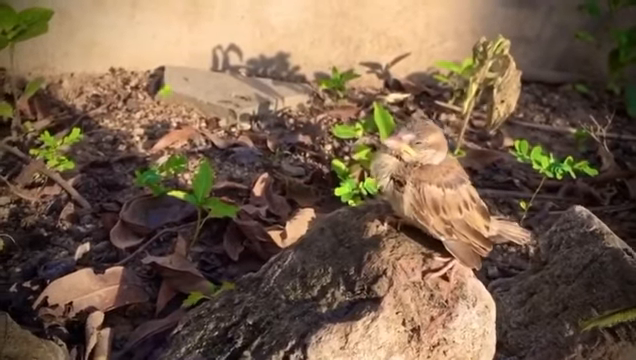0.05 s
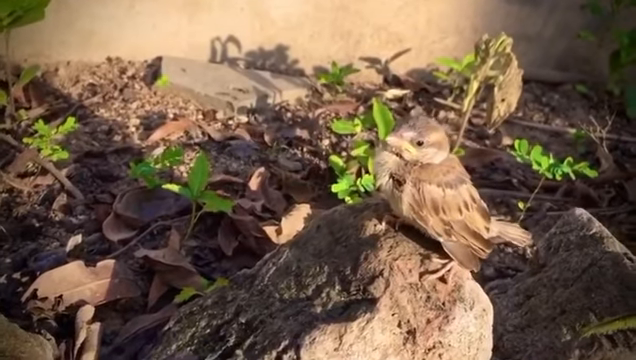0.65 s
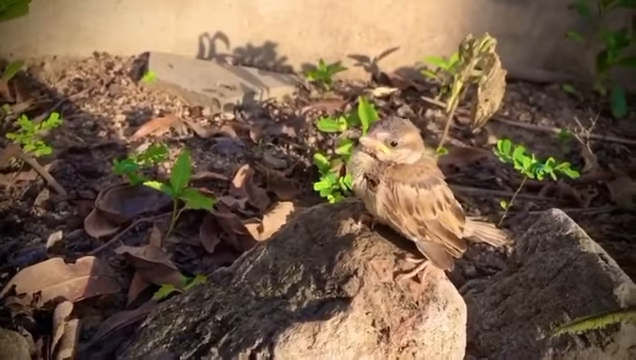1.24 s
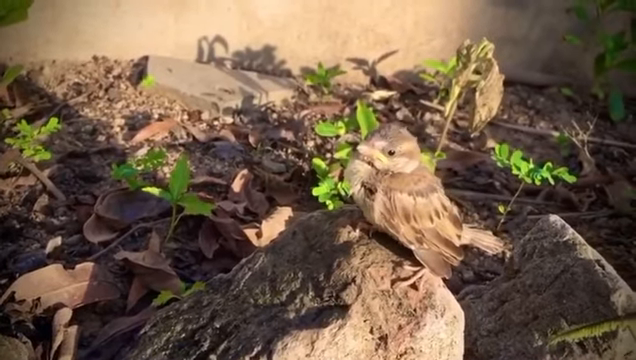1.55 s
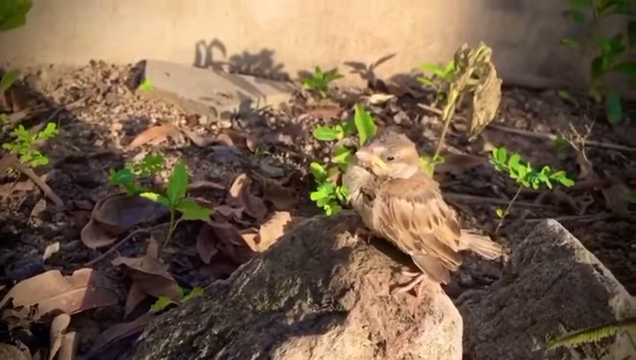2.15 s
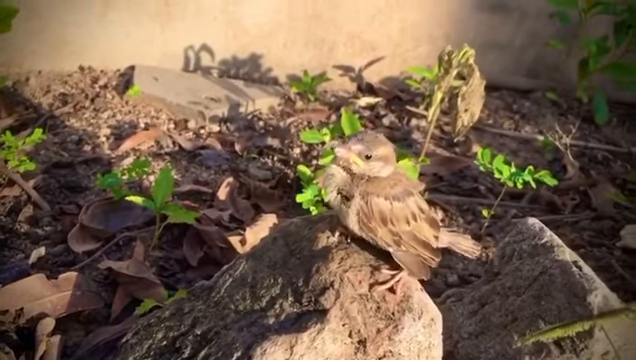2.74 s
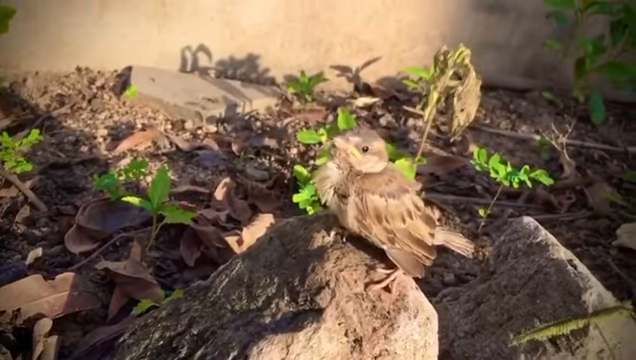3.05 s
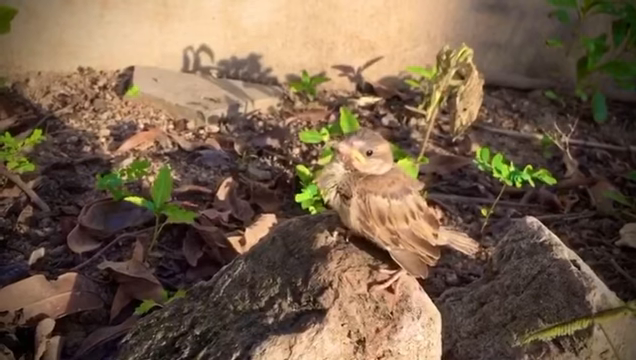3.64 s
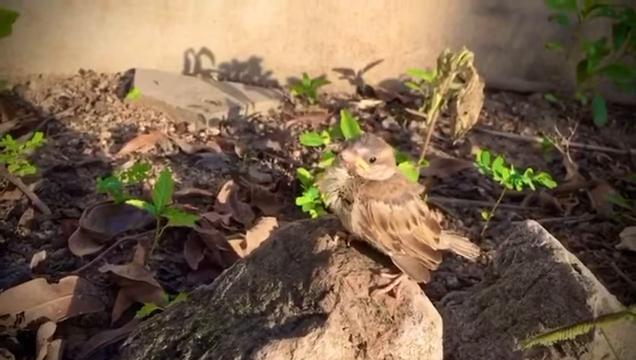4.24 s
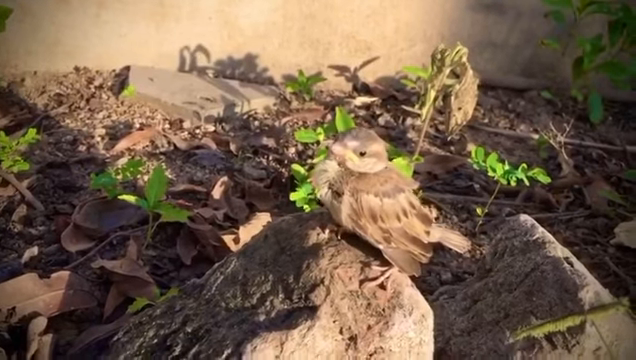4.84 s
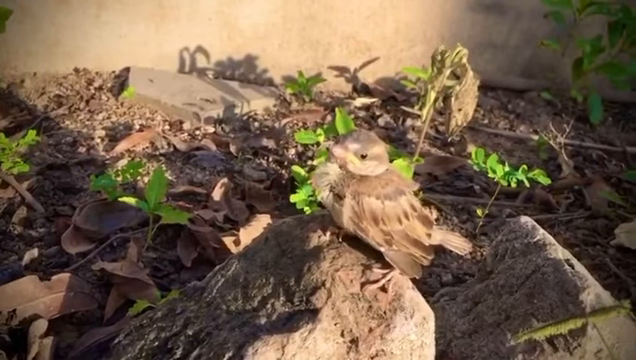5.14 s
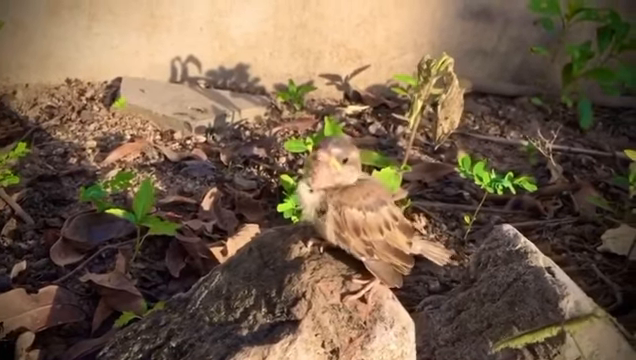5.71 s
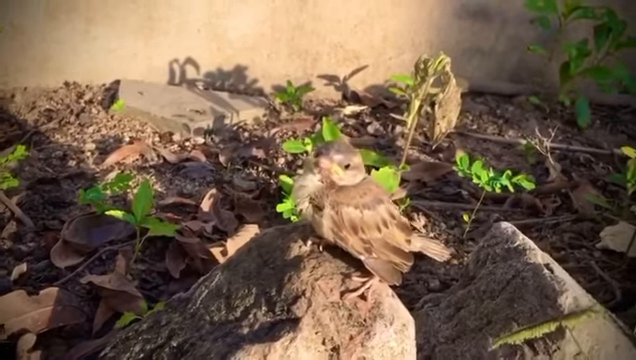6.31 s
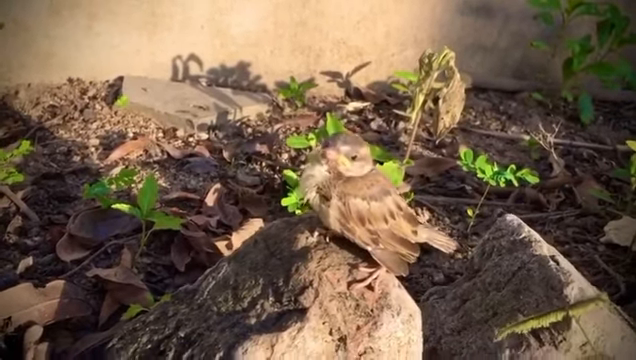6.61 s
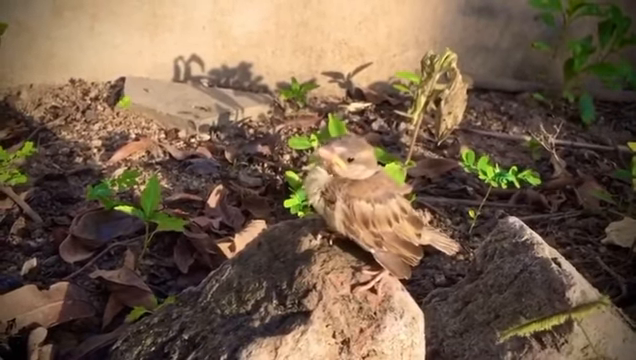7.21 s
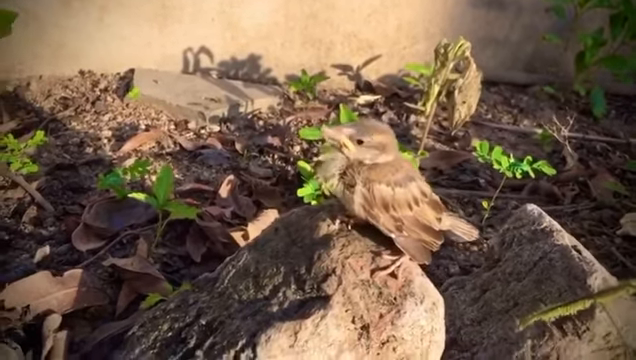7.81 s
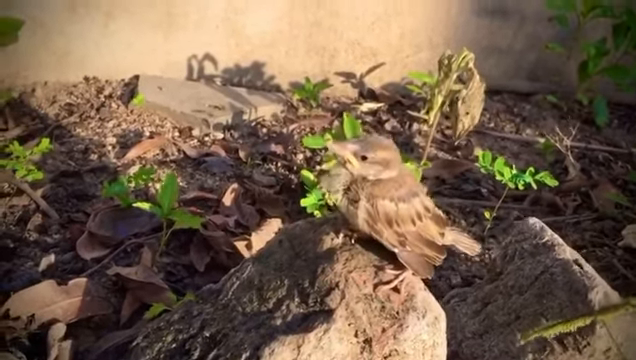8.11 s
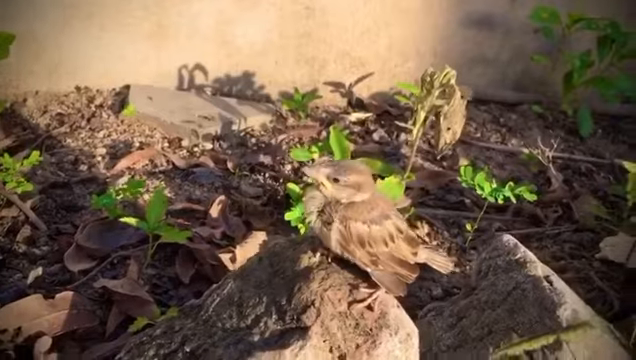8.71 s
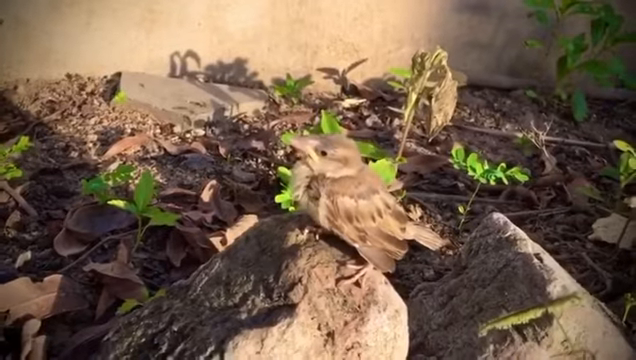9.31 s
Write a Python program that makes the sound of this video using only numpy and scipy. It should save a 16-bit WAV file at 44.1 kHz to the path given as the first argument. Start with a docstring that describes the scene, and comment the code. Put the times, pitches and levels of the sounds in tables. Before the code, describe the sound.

Sparrows cheep softly at a distance throughout, about once a second, in a lightly echoing yard with a faint hiss and low rumble of air. A young sparrow close to the microphone gives four loud, sharp, high chirps at about 2.5, 5.3, 6.5 and 8.5 seconds, each very short and arching twice in pitch. These are by far the loudest sounds. Another sparrow further off gives similar, quieter chirps near 1.7, 4.6, 6.1 and 7.6 seconds, and a quick pair around 9.3. Distant crows caw hoarsely, three times between about 2.3 and 3.9 seconds, then more faintly from 7 seconds on. A quick run of soft, raspy sparrow scolding comes from about 3.2 to 4.7 seconds and returns briefly near 9. A few thin, faint whistles and twitters are scattered in the background.

```python
"""A yard with a garden wall: close by, a young sparrow on a stone gives four loud chirps.
Each chirp arches up and down twice in pitch. Both sides of the bird's voice box (the syrinx)
sing at once, and their two tones beat against each other. Other sparrows chirp and scold further
off, crows caw in the distance, and the yard echoes them all over a faint hiss and low rumble."""
import sys
import numpy as np
from scipy import signal
from scipy.fft import rfft, irfft, next_fast_len
from scipy.io import wavfile
from scipy.ndimage import uniform_filter1d

SR = 44100
rng = np.random.default_rng(int(sys.argv[2]) if len(sys.argv) > 2 else 0)


def log_audio(samples):
    """Write samples as a 16-bit WAV file to the path given in sys.argv[1]."""
    # one column per channel
    frames = np.atleast_2d(samples).T
    # limit to full scale, then quantise
    limited = np.clip(frames, -1, 1)
    pcm = np.round(limited * 32767).astype(np.int16)
    wavfile.write(sys.argv[1], SR, pcm)


N = 421596


def undb(db):
    """Turn decibels into a gain to multiply by."""
    return 10 ** (np.asarray(db) / 20)


def unit(x):
    """Scale a sound so that its average strength (rms) is 1."""
    return x / np.sqrt(np.mean(x ** 2) + 1e-20)


def add(out, start_s, x):
    """Mix the sound x into out, beginning at start_s."""
    i = int(round(start_s * SR))
    x, i = x[max(-i, 0):], max(i, 0)
    out[i:i + len(x)] += x[:max(len(out) - i, 0)]


def ramp(u):
    """A smooth step from 0 to 1 as u goes from 0 to 1."""
    return np.sin(np.pi / 2 * np.clip(u, 0, 1)) ** 2


def swell(t, edge):
    """Fade a note in and out; each fade takes the share edge of its length."""
    return ramp(np.minimum(t, t[-1] - t) / (edge * t[-1]))


def bend(along, start_hz, middle_hz, end_hz):
    """A pitch that curves through three values as along goes from 0 to 1."""
    curve = np.polyfit([0, .5, 1], [start_hz, middle_hz, end_hz], 2)
    return np.polyval(curve, np.clip(along, 0, 1))


def phase_of(hz):
    """The growing angle of a wave that follows the pitch hz, from a random start."""
    return 2 * np.pi * (np.cumsum(hz) / SR + rng.random())


def wobble(t, hz):
    """A random wavering, about 1 in size, that takes a new turn hz times a second."""
    return np.interp((t - t[0]) * hz, np.arange(4096), rng.standard_normal(4096))


def colour(x, points):
    """Make some frequencies louder and others softer, along (frequency_hz, gain_db) points."""
    hz, db = np.transpose(points)
    size = next_fast_len(len(x))
    bins_hz = np.maximum(np.fft.rfftfreq(size, 1 / SR), 1)
    gain = undb(np.interp(np.log(bins_hz), np.log(hz), db))
    return irfft(rfft(x, size) * gain, size)[:len(x)]


def resonate(x, hz, width_hz):
    """Let through one band around hz, as a hollow space does."""
    return signal.lfilter(*signal.iirpeak(hz, hz / width_hz, fs=SR), x)


def yard(x, echo_db, early_s, late_db, late_s=1.0):
    """Walls and leaves scatter the sound; a faint, duller echo lingers between the houses."""
    t = np.arange(int(1.2 * SR)) / SR
    early, late = rng.standard_normal((2, len(t)))
    # the echoes build up, then fall by 60 dB over early_s and late_s
    early = unit(early * undb(-60 * t / early_s) * (1 - np.exp(-t / .0037)))
    late = colour(late, [(300, -2), (2000, 7), (2900, -4), (3700, -7.5), (4300, -3), (4900, -15.5),
                         (10000, -10.5)])
    late = unit(late * undb(-60 * t / late_s) * (1 - np.exp(-t / .017)))
    echo = signal.fftconvolve(x, (early + undb(late_db) * late) / np.sqrt(len(t)))[:N]
    return (x + undb(echo_db) * echo) / np.sqrt(1 + undb(2 * echo_db))


def air(hiss_db=-61, calm_db=-74.5):
    """Smooth outdoor hiss and a low rumble that comes and goes with the gusts."""
    # the tone colour of outdoor air: frequency_hz, gain_db
    hiss_shape = [(15, -47), (25, 0.5), (85, -2.5), (246, -14), (296, -17.5), (346, -14.5), (383, -23.5),
                  (815, -25.5), (1030, -27), (1920, -25), (2770, -31), (10700, -44), (12500, -51),
                  (16200, -92.5), (22000, -120)]
    # soft gusts that raise the rumble: start_s, length_s, level_db
    gust_table = [(-.1, 0.91, -55.5), (0.588, .22, -52), (3.355, 1.3, -62), (4.853, .45, -60.5),
                  (6.59, 2.82, -65.5), (9.099, 0.48, -54)]
    t = np.arange(N) / SR
    hiss = unit(colour(rng.standard_normal(N), hiss_shape)) * undb(hiss_db + .28 * wobble(t, 4.9))
    rumble_shape = [(20, -42.5), (45, -4), (75, 1.5), (150, -12), (300, -24.5), (1000, -40.5),
                    (4000, -61.5)]
    rumble = unit(colour(rng.standard_normal(N), rumble_shape))
    wind = np.full(N, undb(calm_db))
    for start_s, length_s, level_db in gust_table:
        t = np.arange(int(length_s * SR)) / SR
        add(wind, start_s, undb(level_db) * swell(t, .36))
    return colour(hiss + rumble * wind, [(15, -36), (30, -12), (52, -2), (12000, 5)])


def rustles(ticks_per_s=500):
    """Dry leaves stir in short showers of tiny dull ticks."""
    # faint rustles: start_s, length_s, level_db
    rustle_table = [(0.541, 0.06442, -62), (0.629, 0.20436, -68.5)]
    out = np.zeros(N)
    for start_s, length_s, level_db in rustle_table:
        t = np.arange(int(length_s * SR)) / SR
        ticks = rng.standard_normal(len(t)) * (rng.random(len(t)) < ticks_per_s / SR)
        ticks = colour(ticks, [(200, 9), (550, -6), (900, 13), (1500, -9.5), (4000, -11), (11000, -23)])
        add(out, start_s, undb(level_db) * swell(t, .15) * unit(ticks))
    return out


def hoots():
    """A very distant bird calls hollowly: one tone plus an overtone three times as high."""
    # hollow calls: start_s, length_s, pitch_hz, level_db, overtone_db
    hoot_table = [(-.04, 0.11, 403.6, -50.5, 10.5), (2.96, 0.14, 414, -51.5, 3.5),
                  (4.137, 0.0866, 414.6, -61, 2), (4.271, 0.13, 412, -58, -1.5),
                  (5.523, 0.13, 400, -58.5, 6), (5.638, 0.11113, 405.6, -58.5, -3),
                  (7.518, 0.12654, 418, -66.5, -18)]
    out = np.zeros(N)
    for start_s, length_s, pitch_hz, level_db, overtone_db in hoot_table:
        t = np.arange(int(length_s * SR)) / SR
        tone = np.sin(phase_of(pitch_hz * (1 + .11 * wobble(t, 250))))
        overtone = np.sin(phase_of(3 * pitch_hz * (1 + .04 * wobble(t, 250))))
        add(out, start_s, undb(level_db) * swell(t, .083) * unit(tone + undb(overtone_db) * overtone))
    return out


def crows(rattle_hz=82, rattle_depth=.62):
    """Hoarse caws: a rattle chops up the voice, and the ringing throat makes it nasal."""
    # caws: start_s, length_s, start_hz, middle_hz, end_hz, level_db, growth_db, throat_ratio
    caw_table = [(1.814, .36, 451, 420.2, 470, -59.5, -1, 1.12),
                 (2.278, 0.32, 419.3, 480, 438, -44, 4.5, 0.95),
                 (2.84, 0.41, 427.2, 478, 422, -44, -3, 0.93),
                 (3.486, 0.37786, 431, 466, 415, -43.5, 0, 0.94195),
                 (4.132, .4, 422.4, 430, 400, -61, 0, 0.88), (4.72, 0.48, 440, 470, 336, -64.5, 4, 1.02),
                 (7.231, 0.45, 445.4, 465, 420, -51.5, -13.5, 0.91),
                 (7.397, 0.83, 470.4, 440, 395, -57.5, -6.5, 0.69),
                 (8.477, 0.72, 419, 445, 610, -60.5, 6, 1.06),
                 (8.907, 0.51, 477, 425, 410, -64.5, 9, 1.072)]
    # bands where a crow's throat rings: centre_hz (before throat_ratio), width_hz, gain_db
    throat_bands = [(883, 170, -7.5), (1447, 260, 2), (1774, 190, 6.5), (2120, 260, -20)]
    out = np.zeros(N)
    for start_s, length_s, start_hz, middle_hz, end_hz, level_db, growth_db, throat_ratio in caw_table:
        t = np.arange(int(length_s * SR)) / SR
        along = t / length_s
        hz = bend(along, start_hz, middle_hz, end_hz)
        phase = phase_of(hz * (1 + .024 * wobble(t, 900)))
        rattle = phase_of(rattle_hz * hz / middle_hz * (1 + .099 * wobble(t, 160)))
        voice = sum(np.sin(k * (phase + .17 * (k - 1) * np.sin(rattle))) for k in range(2, 6))
        hoarse = 1.6 * (length_s / .4) ** 2  # longer calls break up more into noise
        voice = voice * (1 + rattle_depth * np.cos(rattle)) + hoarse * rng.standard_normal(len(t))
        caw = 0
        for centre_hz, width_hz, gain_db in throat_bands:
            ring_hz = centre_hz * throat_ratio
            caw += undb(gain_db) * resonate(resonate(voice, ring_hz, width_hz), ring_hz, width_hz)
        add(out, start_s, unit(caw) * swell(t, .26) * undb(level_db + growth_db * (along - .5)))
    return out


def twitter(count=18, span_s=(1.95, 3.2), range_hz=(2860, 6450), note_s=.067, glide=.11, level_db=-60):
    """A far flock twitters for a while: tiny notes that slide up or down at random."""
    out, t = np.zeros(N), np.arange(int(note_s * SR)) / SR
    for when, height, slope in rng.random((count, 3)):
        slide = glide * (2 * slope - 1) * t / t[-1]
        hz = np.interp(height, [0, 1], range_hz) * (1 + slide + .028 * wobble(t, 300))
        note = swell(t, .26) * unit(np.sin(phase_of(hz)))
        add(out, np.interp(when, [0, 1], span_s), undb(level_db) * note)
    return out


def cheeps(base_s=.215, glide_hz=(4600, 3640), upper_ratio=1.224, trill_hz=170):
    """Far sparrows cheep with two voices at once, buzzing as the pitch slides down."""
    # far cheeps: start_s, level_db, pitch_ratio, length_ratio
    cheep_table = [(.165, -43.5, 0.95, 0.89), (0.813, -41, 0.96, 1), (1.565, -44, 0.97, 0.81),
                   (2.296, -39, 0.97, 0.81), (2.821, -51.5, 0.79, 1), (3.239, -40.5, 0.9099, 0.651),
                   (4.295, -41, 0.9228, 1), (4.904, -43, 0.96, 0.75), (5.795, -43.5, 0.94, 0.91),
                   (6.661, -41, 1.03, 0.71), (7.391, -46.5, 0.94, 1), (7.488, -42, 1.0725, 0.7),
                   (8.258, -39, 0.97, 0.94), (9.13, -42, 0.9844, 0.73)]
    out = np.zeros(N)
    for start_s, level_db, pitch_ratio, length_ratio in cheep_table:
        t = np.arange(0, base_s, 1 / (SR * length_ratio))
        trill = .08 * np.sin(phase_of(trill_hz * (1 + .18 * wobble(t, 100))))
        waver = .055 * wobble(t, 900) + .039 * wobble(t, 50)
        hz = pitch_ratio * np.linspace(*glide_hz, len(t)) * (1 + trill + waver)
        lower = phase_of(hz)
        upper = phase_of(upper_ratio * hz * (1 + .1 * wobble(t, 70)))
        tone = np.sin(lower) + undb(-6) * np.sin(upper) + undb(-37.5) * np.sin(2 * lower)
        add(out, start_s, unit(tone) * undb(level_db + 2.5 * wobble(t, 60)) * swell(t, .25))
    return colour(out, [(2600, -6.5), (3300, -4.5), (4100, -2), (5500, -4), (7500, -1)])


def whistles():
    """Thin bird whistles, pure to hoarse: one sliding tone and its octave (twice the pitch)."""
    # whistled notes: start_s, length_s, start_hz, end_hz, level_db, octave_db, roughness (0-1)
    whistle_table = [(0.241, 0.11, 4050, 2653, -44.5, -41, 0.25), (2.135, .035, 4304, 2193, -55, -20, 0.4),
                     (2.233, 0.078, 2450, 3460, -47.5, -5.5, .7),
                     (3.216, 0.0375, 4000, 4310, -41.5, -31, 0.46),
                     (3.123, 0.098, 5900, 5350, -59, -10, 0.83),
                     (5.1, 0.21404, 4480, 4480, -66.5, -32.5, 0.08),
                     (5.616, 0.3, 4440, 4319, -67.5, -19, 0), (6.014, .025, 2450, 2186, -56, -13, 0.63),
                     (7.847, 0.051, 3500, 2664, -67, -22.5, 0.5), (7.92, .06, 2700, 3124, -77.5, -26, 0.4),
                     (7.939, 0.19, 4150, 4110, -68, -34, 0.12)]
    out = np.zeros(N)
    for start_s, length_s, start_hz, end_hz, level_db, octave_db, roughness in whistle_table:
        t = np.arange(int(length_s * SR)) / SR
        shake = roughness * (.11 * wobble(t, 900) + .05 * wobble(t, 150))
        phase = phase_of(np.geomspace(start_hz, end_hz, len(t)) * (1 + shake))
        tone = unit(np.sin(phase) + undb(octave_db) * np.sin(2 * phase))
        add(out, start_s, undb(level_db + .8 * wobble(t, 80)) * swell(t, .12) * tone)
    return out


def scolds(base_s=.076, arch_hz=(477, 589.4, 413), full_db=-40, far_span_db=7.5):
    """Rasping stacks of overtones that dull as the beak closes. Returns the near and far parts."""
    # scolding notes: start_s, level_db, pitch_ratio, length_ratio
    scold_table = [(2.135, -56, 1.33, 0.4), (3.262, -39.5, 0.97, 1), (3.362, -40, 1.03, 0.93),
                   (3.56, -38.5, 1.18, 0.925), (3.697, -42.5, 1.03, 0.93), (3.81, -51, 0.55, 0.8078),
                   (3.95, -47, 1.67, 0.92), (4.065, -47, 1.96, 0.98), (4.18, -46, 0.82, 0.85),
                   (4.452, -37, 1.02, 0.9), (4.292, -44.5, 1.5, 0.77), (4.43, -44, 1.35, 0.53),
                   (4.568, -44.5, 1.7, 0.52), (4.595, -42, 0.97, 0.88), (8.905, -48.5, 0.82, 0.49),
                   (8.98, -45.5, 1.41, 0.53)]
    near, far = np.zeros(N), np.zeros(N)
    for start_s, level_db, pitch_ratio, length_ratio in scold_table:
        t = np.arange(0, base_s, 1 / (SR * length_ratio))
        weaker_db = max(full_db - level_db, 0)  # weaker notes are shakier and come from further off
        far_share = ramp(weaker_db / far_span_db)
        shake = (.027 + .007 * weaker_db) * wobble(t, 1200) + .025 * wobble(t, 45)
        hz = pitch_ratio * bend(t / t[-1], *arch_hz) * (1 + shake)
        beak_hz = bend(t / t[-1], 7500, 4350, 2550)  # overtones near this are the loudest
        tone = 0
        for k in range(3, 21):
            gain = undb(3.5 * wobble(t, 300)) / np.hypot(1, (k * hz - beak_hz) / 520)
            tone += gain * np.sin(phase_of(k * hz))
        note = unit(tone) * undb(level_db) * swell(t, .26)
        add(near, start_s, np.sqrt(1 - far_share) * note)
        add(far, start_s, np.sqrt(far_share) * note)
    near = colour(near, [(1200, 2), (1750, 10), (2400, -6), (3000, 1.5), (4000, 3), (6800, -3.5),
                         (8000, -12.5), (12000, -4.5)])
    far = colour(far, [(1200, -.5), (2400, -3.5), (4000, 3.5), (6800, -2), (8000, -10), (12000, -10)])
    return near, far


def membrane(t, hz, strength, roughness):
    """One vibrating side of the voice box; roughness shakes its pitch and its level."""
    phase = phase_of(hz * (1 + .007 * wobble(t, 120) + .085 * roughness * wobble(t, 1500)))
    flutter = 1 + np.clip(roughness, 0, 1) * np.tanh(wobble(t, 900))
    return np.sqrt(2) * strength * undb(.54 * wobble(t, 200)) * flutter * np.sin(phase)


def voice_box(t, breath, pitch_ratio, idle_hz=2917.9, idle_db=-35.5, upper_ratio=1.118):
    """Effort lifts pitch and level and clears the voice. Returns the tone and its roughness."""
    # both tables describe the basic chirp, before a bird's own pitch, length and level apply
    # pushes of effort: start_s, rise_s, hold_s, fall_s, peak_hz, lower_side_db, upper_side_db
    push_table = [(0.0119, .020, .012, .019, 5042, -14, -12.8), (.071, .040, .001, .015, 4478, -13, -16.5),
                  (.142, .008, .001, .009, 3480, -28.5, -45.5)]
    # the upper side sags on hoarsely after a push: start_s, length_s, start_hz, middle_hz, end_hz, level_db
    sag_table = [(0.057, 0.024, 5530, 4850, 5500, -22.5), (0.117, .018, 5200, 4500, 3600, -29.5)]
    effort, hz, lower, upper = 0, idle_hz, undb(idle_db) * breath, 0
    for start_s, rise_s, hold_s, fall_s, peak_hz, lower_db, upper_db in push_table:
        end_s = start_s + rise_s + hold_s + fall_s
        push = ramp((t - start_s) / rise_s) * ramp((end_s - t) / fall_s)
        effort += push
        hz += (peak_hz - idle_hz) * push
        lower_push = np.sin(np.pi / 2 * np.minimum(push / .65, 1))  # full strength from 65% effort
        lower = np.hypot(lower, undb(lower_db) * lower_push)
        upper += undb(upper_db) * push ** .78
    hz = pitch_ratio * hz
    roughness = .048 + .65 * np.exp(-effort / .25)
    # the octave is faint, except for a flare as the first arch sets in
    octave = undb(-46.5) * breath + undb(-22.5) * np.exp(-((t - .013) / .0081) ** 2)
    tone = membrane(t, hz, lower, roughness) + membrane(t, hz * upper_ratio, upper, roughness)
    tone += membrane(t, 2 * hz, octave, np.maximum(roughness, .44))
    for start_s, length_s, *sag_hz, level_db in sag_table:
        along = (t - start_s) / length_s
        strength = undb(level_db) * ramp(np.minimum(along, 1 - along) / .083)
        tone += membrane(t, pitch_ratio * bend(along, *sag_hz), strength, roughness=.45)
    return tone, roughness


def chirps(table, mix_db, rasp_db, hiss_db, base_s=.186, lead_s=.02, rise_s=.023, fall_s=.033):
    """One breath drives two membranes through two arches of pitch and a small last flick."""
    # tone colours: frequency_hz, gain_db
    mix_shape = [(100, -70.5), (300, -42), (550, -18), (2000, -26.5), (8000, -12.5), (12000, -4.5)]
    rasp_shape = [(1500, -30), (2400, -24.5), (3100, -6.5), (5400, 0), (6800, -26.5), (9000, -38)]
    hiss_shape = [(1000, -13), (3000, -6), (6200, 11.5), (7700, -5), (9100, 2.5), (10000, -13),
                  (11500, -5), (12500, -19.5)]
    beak_shape = [(500, -28), (1600, -4), (2300, -4.5), (2900, -5), (6700, -2), (7800, -5),
                  (9000, -1.5), (11500, -4), (12500, -4)]
    out = np.zeros(N)
    for start_s, level_db, pitch_ratio, length_ratio in table:
        t = np.arange(-lead_s, base_s - lead_s, 1 / (SR * length_ratio))
        opening = np.minimum((t - t[0]) / rise_s, (t[-1] - t) / fall_s)
        breath = undb(28 * (np.minimum(opening, 1) - 1))  # swells by 28 dB, holds, dies away
        tone, roughness = voice_box(t, breath, pitch_ratio)
        # the shared airway mixes the two voices into sum and difference tones
        mixed = undb(mix_db) * colour(tone ** 2, mix_shape)
        loudness = np.sqrt(np.abs(uniform_filter1d(tone ** 2, int(SR / 200))))
        rasp = unit(colour(rng.standard_normal(len(t)), rasp_shape))
        rasp *= undb(rasp_db) * loudness * roughness
        hiss = unit(colour(rng.standard_normal(len(t)), hiss_shape))
        hiss *= undb(hiss_db - 100 * t) * breath  # air rushing past the membranes, ever weaker
        voice = colour(tone + rasp + hiss, beak_shape)  # a small beak passes little bass
        add(out, start_s - lead_s, undb(level_db) * (voice + mixed) * swell(t - t[0], .04))
    return out


def scene():
    """The young sparrow is close and clear; more of the other birds' sound arrives as echo."""
    # the young sparrow's chirps: start_s, level_db, pitch_ratio, length_ratio
    young_chirps = [(2.520, 2, 0.98, 0.9738), (5.2955, 2.5, 0.98, 0.99), (6.4575, 2.5, 0.98, 0.98),
                    (8.4885, 2, 0.98, 0.9718)]
    # a neighbour's chirps of the same shape: start_s, level_db, pitch_ratio, length_ratio
    neighbour_chirps = [(1.665, -26.5, 0.99, 0.93), (4.575, -25, 0.9488, 0.94), (5.415, -34, 0.93, 0.88),
                        (6.115, -27.5, 1, 0.92), (7.565, -25.5, 0.99, 0.89), (9.21, -28, 1, 0.97),
                        (9.315, -25, 1, 0.89)]
    young = chirps(young_chirps, mix_db=-22, rasp_db=-4, hiss_db=-34)
    young = yard(young, echo_db=-16, early_s=.083, late_db=-16)
    neighbour = chirps(neighbour_chirps, mix_db=-11.5, rasp_db=-3, hiss_db=-26)
    neighbour = colour(neighbour, [(3000, 4), (4400, .5), (5200, -13), (8000, 1.5), (10000, -12.5),
                                   (11200, 8.5)])
    near_scolds, far_scolds = scolds()
    neighbour = yard(neighbour, echo_db=2, early_s=.23, late_db=-18.5)
    near = yard(near_scolds + whistles(), echo_db=-7.5, early_s=.53, late_db=-18.5)
    far = yard(cheeps() + far_scolds + twitter(), echo_db=3, early_s=.44, late_db=-17)
    distant = yard(crows() + hoots(), echo_db=-2.5, early_s=.42, late_db=-17.5)
    return (young + neighbour + near + far + distant + rustles() + air())[None]


def record(dry):
    """Cut away the highest treble, above 12100 Hz."""
    return signal.sosfilt(signal.ellip(8, .2, 70, 12100, fs=SR, output="sos"), dry)


dry = scene()
out = record(dry)
log_audio(out)
```